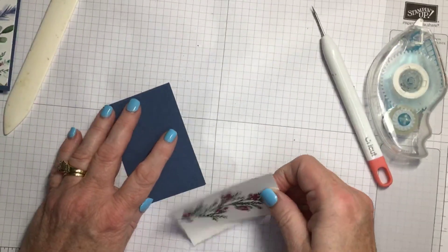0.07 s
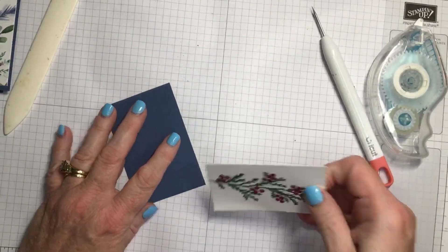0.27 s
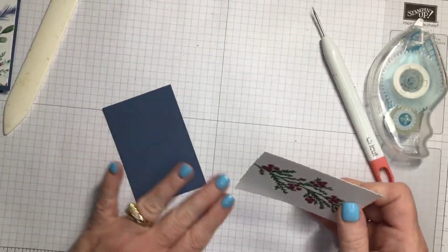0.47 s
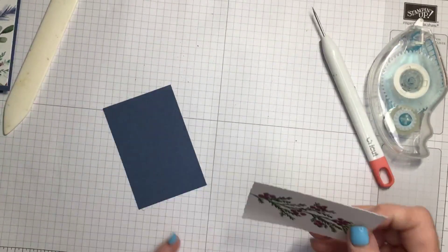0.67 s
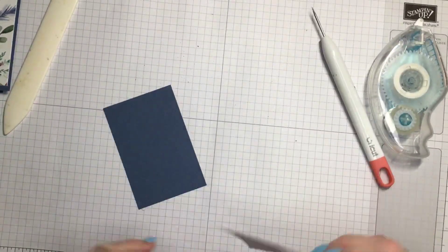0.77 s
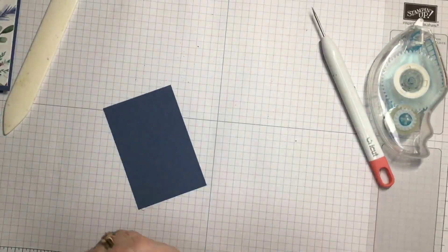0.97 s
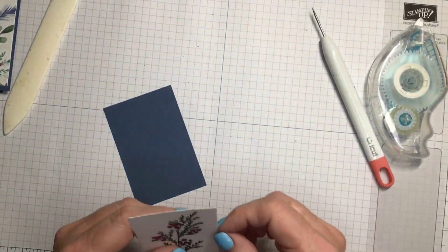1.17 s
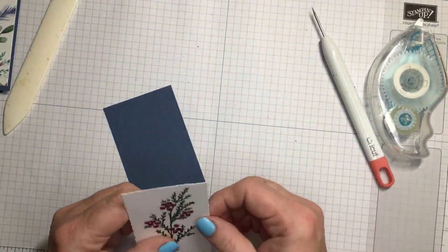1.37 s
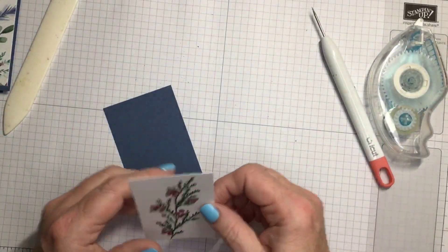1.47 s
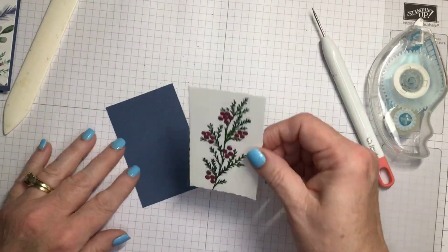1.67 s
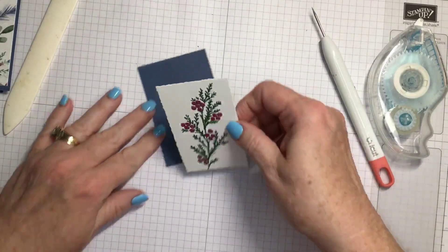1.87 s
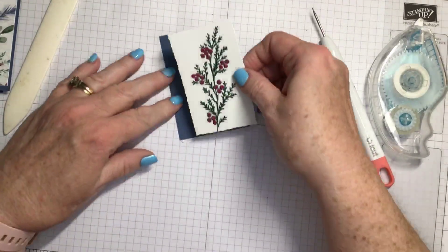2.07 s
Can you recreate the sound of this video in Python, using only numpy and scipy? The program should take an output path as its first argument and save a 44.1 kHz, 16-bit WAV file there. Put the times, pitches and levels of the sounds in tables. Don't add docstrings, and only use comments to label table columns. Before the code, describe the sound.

A stiff paper card snaps and rustles in fingers, close up, over a faint low drone

```python
import sys
import numpy as np
from scipy import signal
from scipy.fft import rfft, irfft
from scipy.io import wavfile

SR = 44100
rng = np.random.default_rng(int(sys.argv[2]) if len(sys.argv) > 2 else 0)


def how_loud(loudness_db):
    steps = np.asarray(loudness_db, float) / 20
    return 10 ** steps


def to_wav(s):
    ch = np.atleast_2d(s).T
    pcm = np.round(np.clip(ch, -1, 1) * 32767)
    wavfile.write(sys.argv[1], SR, pcm.astype(np.int16))


N = 92610
PATCHY_DB = 1.2


def rms_one(x):
    return x / np.sqrt(np.mean(x ** 2) + 1e-20)


def drift(rate):
    r = np.exp(-80 * np.pi * rate / SR)
    noise = rng.standard_normal(N // 40 + 2002)
    slow = signal.lfilter([1], [1, -2 * r, r * r], noise)[2000:]
    return np.interp(np.arange(N) / 40, np.arange(len(slow)), rms_one(slow))


def resonate(x, hz, width_hz):
    r = np.exp(-np.pi * width_hz / SR)
    zeros = np.array([1, 0, -1]) * (1 - r * r) / 2
    poles = [1, -2 * r * np.cos(2 * np.pi * hz / SR), r * r]
    return signal.lfilter(zeros, poles, x)


def colour(x, spectrum, patchy_db):
    hz = np.fft.rfftfreq(N, 1 / SR) + 1
    points_hz, points_db = np.transpose(spectrum)
    shaped = rfft(x) * how_loud(np.interp(np.log(hz), np.log(points_hz), points_db))
    place = 2 * np.log2(hz / 50)
    total = np.zeros(N)
    for k in range(18):
        band = irfft(shaped * np.clip(1 - abs(place - k), 0, 1), N)
        total += band * how_loud(patchy_db * drift(16))
    return rms_one(total)


# (frequency [Hz], density [dB per Hz])
FLOOR_SPECTRUM = [(60, -49.5), (100, -17), (195, -7), (420, -15.5), (1400, -16.5), (2700, -16),
                  (6500, -29.5), (16000, -37)]
# (frequency [Hz], width [Hz], rms level [dB])
FLOOR_PEAKS = [(190, 25, -65), (233.6, 76, -67.5), (1371, 90, -73.5), (2816, 110, -76)]


def room_floor():
    out = how_loud(-64.5) * colour(rng.standard_normal(N), FLOOR_SPECTRUM, PATCHY_DB)
    for hz, width_hz, db in FLOOR_PEAKS:
        level = how_loud(db + PATCHY_DB * drift(7.4))
        out = out + level * rms_one(resonate(rng.standard_normal(N), hz, width_hz))
    return out


def hum():
    hum_hz, width_hz, level_db = 114, 8, -68.5
    rise_db = np.interp(np.arange(N) / SR, [0.91, 0.97], [-10, 0])
    tone = resonate(rng.standard_normal(N), hum_hz, width_hz)
    tone = resonate(tone, hum_hz, 3.6 * width_hz)
    return how_loud(level_db + rise_db) * rms_one(tone)


# (time [s], pitch [Hz], rms level [dB])
DRONE_COURSE = [
    (0, 144.6, -55),
    (.2, 145.6, -53.5),
    (.38, 143.8, -55),
    (.45, 151.2, -62),
    (0.562, 146, -68),
    (.66, 151.9, -70),
    (.78, 145.6, -61.5),
    (0.861, 140.6, -55.5),
    (.94, 135.7, -63.5),
]


def drone():
    flutter_db, fade_s = 1.2, 0.03
    t = np.arange(N) / SR
    s, hz, db = np.transpose(DRONE_COURSE)
    level = how_loud(np.interp(t, s, db) + flutter_db * drift(3.5))
    level = level * np.exp(-np.maximum(t - s[-1], 0) / fade_s)
    phase = 2 * np.pi * np.cumsum(np.interp(t, s, hz)) / SR
    return np.sqrt(2) * level * np.sin(phase)


def room(x):
    t60_s, treble_t60_s, gap_s, split_hz = 0.12, 0.6 * 0.12, 0.0078, 4000
    t = np.arange(SR // 2) / SR
    noise = rng.standard_normal(len(t)) * (t > gap_s)
    low = signal.sosfilt(signal.butter(1, split_hz, fs=SR, output="sos"), noise)
    tail = low * how_loud(-60 * t / t60_s) + (noise - low) * how_loud(-60 * t / treble_t60_s)
    return signal.fftconvolve(x, tail / np.sqrt(np.sum(tail ** 2)))[:N]


def friction():
    grains_per_s, spread_db, grain_share = 2500, 3.0, 0.35
    sizes = how_loud(spread_db * np.minimum(rng.exponential(1, N), 5)) * rng.choice([-1, 1], N)
    dice = rng.random(N)
    grains = sizes * (dice < grains_per_s * how_loud(2.1 * drift(40)) / SR)
    return np.sqrt(grain_share) * rms_one(grains) + np.sqrt(1 - grain_share) * rng.standard_normal(N)


# (start [s], strongest [s], end [s], level [dB], brightness [0-1])
STROKES = [(-.05, .0, 0.16, -61.5, 0.26), (0.09, 0.218, 0.21, -54, 0.36), (0.212, 0.214, 0.39, -58.5, 0.1),
           (0.266, 0.342, 0.36, -49.5, 0.5), (0.356, 0.384, 0.49, -47, 0.56), (.43, 0.483, 0.57, -58, 0.06),
           (0.567, 0.606, 0.63, -59.5, 0), (0.65, 0.687, 0.733, -51, 0), (0.693, 0.722, 0.81, -55.5, 0.2),
           (0.667, 0.73, 0.76, -56, 1), (.76, 0.86, 1.007, -51.5, 0.93), (0.897, 0.984, 1.03, -63, 0.67),
           (1.162, 1.187, 1.17, -71.5, 0.93), (1.215, 1.233, 1.314, -58, 0.1),
           (1.273, 1.295, 1.21, -53, 0.26), (1.303, 1.297, 1.347, -43, 0.08),
           (1.34, 1.393, 1.44, -59, 0.05), (1.406, 1.42, 1.47, -61, 0.18),
           (1.484, 1.499, 1.508, -60.5, 0.67), (1.594, 1.607, 2.04, -67, 0),
           (1.651, 1.703, 1.655, -63.5, 1), (1.928, 1.95, 2.06, -64.5, 0.54),
           (1.945, 2.043, 2.5, -61, 0.67), (2.02, 2.117, 2.43, -52.5, 0.97)]
# (frequency [Hz], density [dB per Hz])
DULL_RUB = [(300, -19.5), (700, -11), (1600, -9.5), (2650, -0.5), (3500, -3), (4400, -11.5), (6500, -14.5),
            (16000, -24.5)]
# (frequency [Hz], density [dB per Hz])
BRIGHT_RUB = [(500, -24), (2400, -13), (3700, -5), (4700, -7), (6000, 0), (10600, -13), (13200, -5),
              (16000, -9)]


def rubbing():
    roundness = 1.4
    t, dull, bright = np.arange(N) / SR, np.zeros(N), np.zeros(N)
    for start, top, end, db, shine in STROKES:
        swell = np.interp(t, [start, top, end], [0, 1, 0])
        power = how_loud(2 * db) * np.sin(np.pi / 2 * swell) ** roundness
        dull += (1 - shine) * power
        bright += shine * power
    x = np.sqrt(dull) * colour(friction(), DULL_RUB, PATCHY_DB)
    x = x + np.sqrt(bright) * colour(friction(), BRIGHT_RUB, PATCHY_DB)
    for dip_hz in (7750, 14450):
        x = x - 0.97 * resonate(x, dip_hz, 550)
    return x


# (frequency [Hz], width [Hz], level [dB])
CARD_MODES = [(289, 59, -4.5), (643, 93, -2), (1148, 620, -6), (1555, 328, -4), (2010, 274, -0.5),
              (2624, 370, 2), (3510, 400, 2.5), (4300, 630, 1.5), (5280, 680, -2), (6374, 325, 2.5),
              (8490, 450, 2.5), (11050, 560, -2.5), (12830, 1200, -8), (15000, 350, -2)]


def card_ring(burst, flex_hz, tilt_db, vary_db):
    below_pitch_db_per_octave = 2.5
    ring = np.zeros(len(burst))
    for k, (hz, width_hz, db) in enumerate(CARD_MODES):
        db = db + vary_db[k] + tilt_db * np.log2(max(hz / 2500, 1))
        db -= below_pitch_db_per_octave * np.log2(max(flex_hz / hz, 1))
        ring += (-1) ** k * how_loud(db) * resonate(burst, hz, width_hz)
    return ring / abs(ring).max()


def card_flex(click, hz, snap_db):
    flex = resonate(resonate(click, hz, 0.2 * hz), hz, 0.2 * hz)
    return how_loud(-1 + 0.5 * min(snap_db + 33, 0)) * flex / abs(flex).max()


def card_crackle(t, grit, dice, tilt_db):
    level_db, t60_s, grains_per_s, grain_size = -13, 0.14, 1200, 2.5
    grains = grit * (0.74 + grain_size * (dice < grains_per_s / SR))
    return how_loud(level_db - 60 * t / t60_s) * resonate(grains, 2100, 3200 * how_loud(0.55 * tilt_db))


# (time [s], peak level [dB], flex pitch [Hz], card ring tilt [dB per octave])
SNAPS = [(.155, -42, 8700, -5), (0.1833, -39, 3700, -23), (0.1898, -37, 2890, -28),
         (0.1925, -27.5, 4200, -6.5), (0.1964, -43, 2000, -24), (.2055, -50, 4500, -6),
         (.2215, -39, 2570, -7), (.2257, -11.5, 2620, -10.5), (.2268, -16.5, 3960, -8),
         (0.2291, -24, 2360, -29), (0.233, -27.5, 1500, -25), (0.2364, -30, 2210, -33),
         (0.2451, -35.5, 4200, -14), (0.2637, -31, 3530, -22), (0.2669, -30, 2770, -13.5),
         (0.338, -32, 3970, 0), (.343, -32, 3290, 3), (0.3895, -18.5, 3500, -2), (0.3917, -8.5, 4210, 7),
         (0.3932, -2.5, 3300, -3), (.3962, -13, 2910, -1), (0.402, -24.5, 1550, -19),
         (.4098, -22.5, 4540, -20), (0.617, -45, 1020, -34), (.7285, -44, 694, -30),
         (.7295, -39, 2400, -37), (0.7398, -41, 2343, -24.5), (1.198, -51, 7660, 1),
         (1.2225, -36.5, 4300, -6.5), (1.2302, -40.5, 886, -2), (1.2374, -45.5, 1050, 0),
         (1.258, -45, 4000, -13), (1.3165, -34.5, 890, -15), (1.303, -42, 2350, -2), (1.3068, -30, 2460, 0),
         (1.3141, -28, 4050, -1.5), (1.323, -32.5, 3860, -7), (1.3254, -27, 1990, -33),
         (1.336, -49, 3030, -10), (1.3878, -40.5, 3000, -20), (1.395, -38, 4260, -24),
         (1.415, -46, 3200, -7), (1.43, -43.5, 3400, -12), (1.293, -47, 4000, -12), (1.5504, -34, 990, -7),
         (1.606, -47, 2800, -20), (1.6155, -43, 1190, -7.5), (1.754, -47, 4510, 0.5),
         (1.933, -48, 3980, -9), (1.944, -46, 2980, -1)]


def snaps():
    burst_s, trim_db, card_spread_db = 0.0014, -2.5, 2.0
    thump_hz, thump_db, push_db, push_s = 208, -38, -29.5, 0.015
    t = np.arange(8192) / SR
    ring, near = np.zeros(N + len(t)), np.zeros(N + len(t))
    noise = rng.standard_normal((len(SNAPS), 2, len(t)))
    chance = rng.random((len(SNAPS), len(t)))
    spread_db = rng.normal(0, card_spread_db, (len(SNAPS), len(CARD_MODES)))
    click = (t == 0) + 1e-18
    thump = how_loud(thump_db) * np.sin(2 * np.pi * thump_hz * t) * t / 0.0056 * np.exp(1 - t / 0.0079)
    push = how_loud(push_db) * t / push_s * np.exp(1 - t / push_s)
    for (s, db, hz, tilt_db), (draw, grit), dice, vary_db in zip(SNAPS, noise, chance, spread_db):
        burst = draw * (t / burst_s) * np.exp(1 - t / burst_s) ** 2 + 3.8 * (t == 0) + 1e-18
        card = card_ring(burst, hz, tilt_db, vary_db)
        flex = card_flex(click, hz, db)
        crackle = card_crackle(t, grit, dice, tilt_db)
        gain = how_loud(db + trim_db) / abs(flex + card).max()
        i = int(s * SR)
        ring[i:i + len(t)] += gain * card
        near[i:i + len(t)] += gain * (flex + crackle + thump + push)
    return ring[:N], near[:N]


def scene():
    ring, near = snaps()
    card = ring + near + how_loud(-11) * room(ring)
    return (card + rubbing() + room_floor() + drone() + hum())[None]


def band_limit(x):
    return signal.sosfilt(signal.butter(12, 16970, fs=SR, output="sos"), x)


def record(dry):
    x = signal.sosfilt(signal.butter(4, 92, "high", fs=SR, output="sos"), dry) + how_loud(-23) * dry
    x = signal.sosfilt(signal.cheby1(8, 1, 15900, fs=SR, output="sos"), x)
    return band_limit(x)


dry = scene()
out = record(dry)
to_wav(out)
```